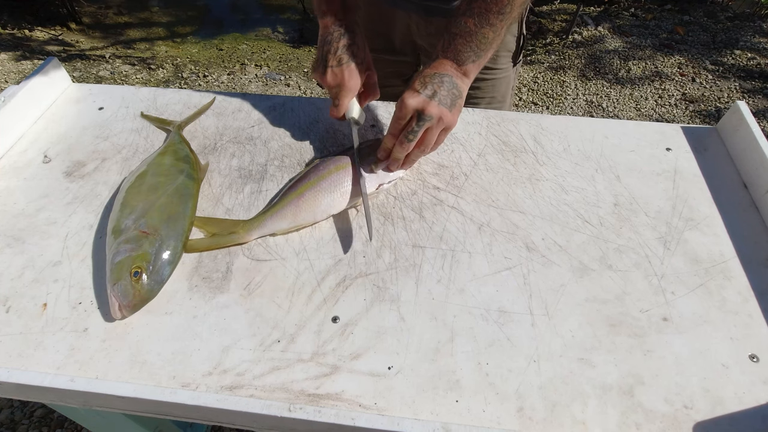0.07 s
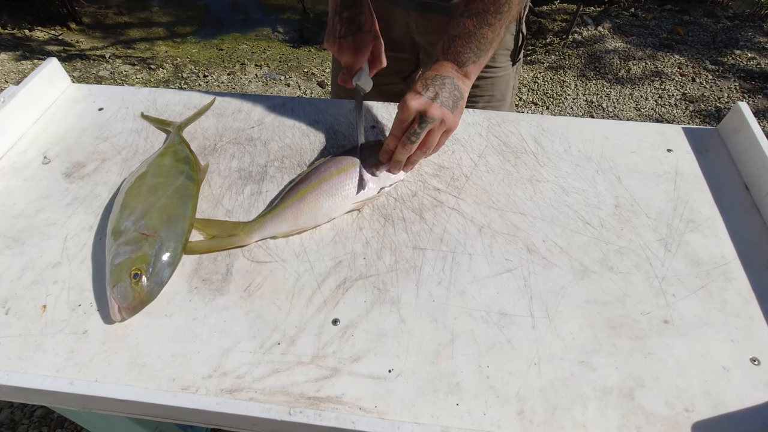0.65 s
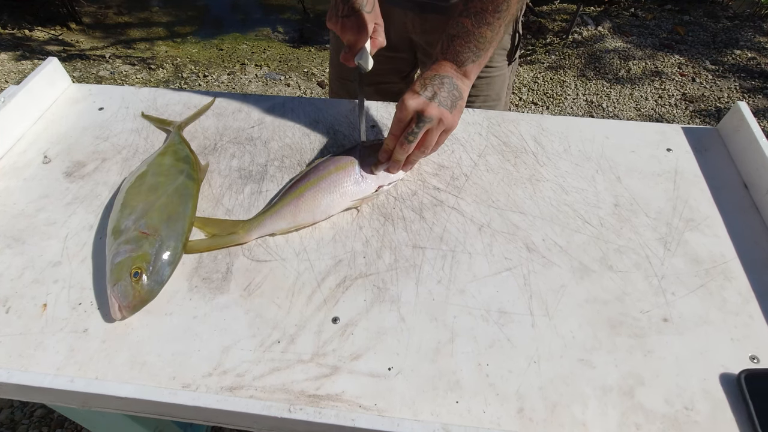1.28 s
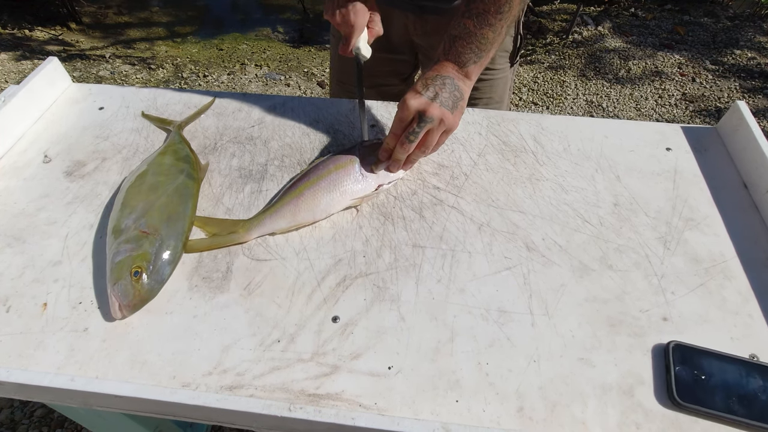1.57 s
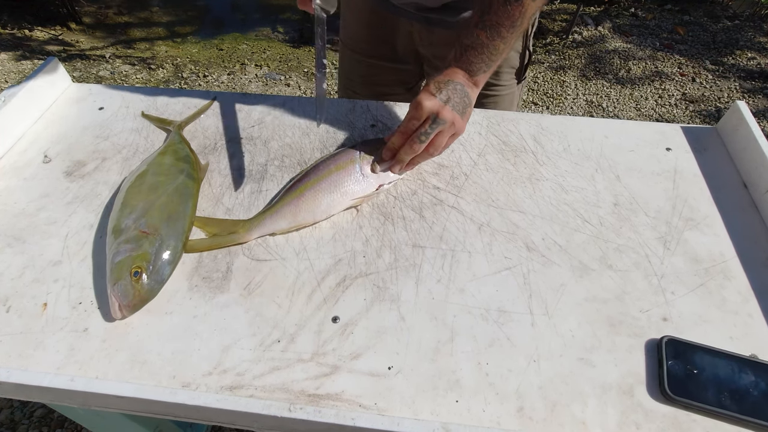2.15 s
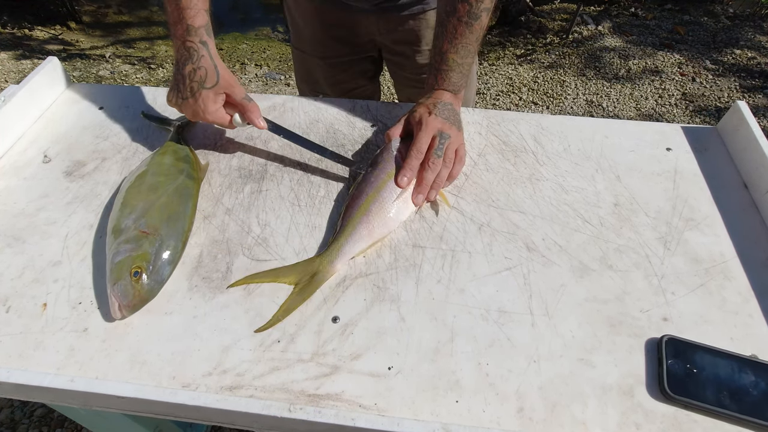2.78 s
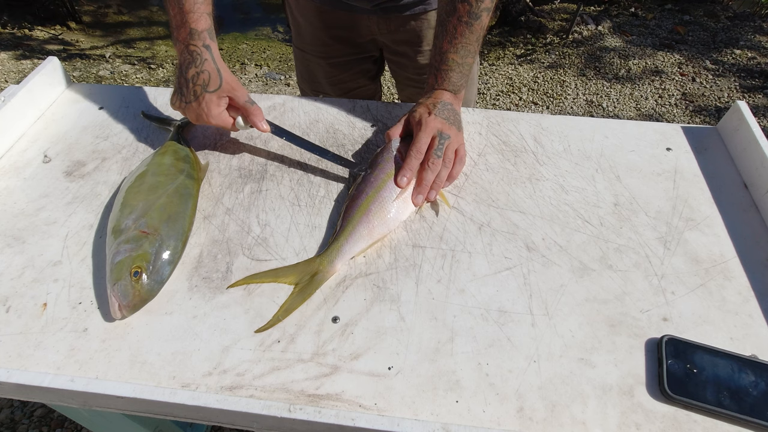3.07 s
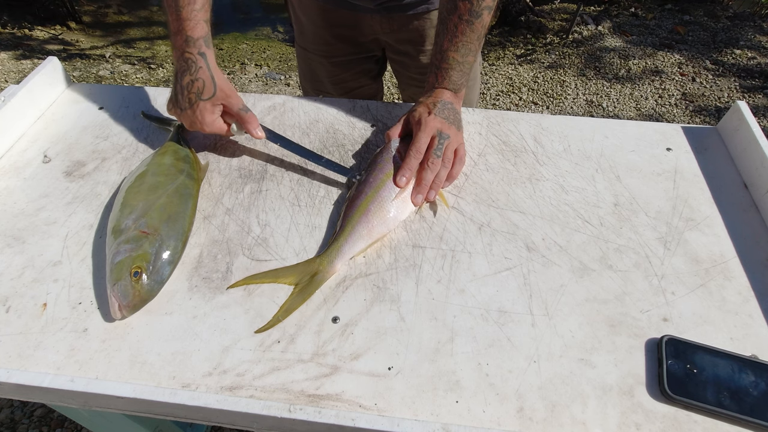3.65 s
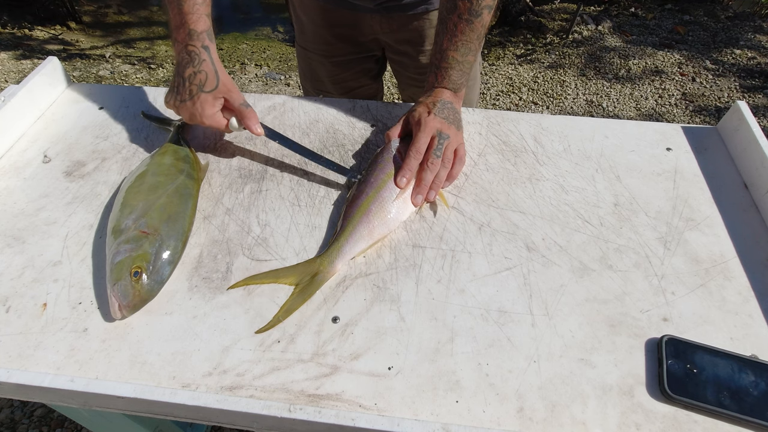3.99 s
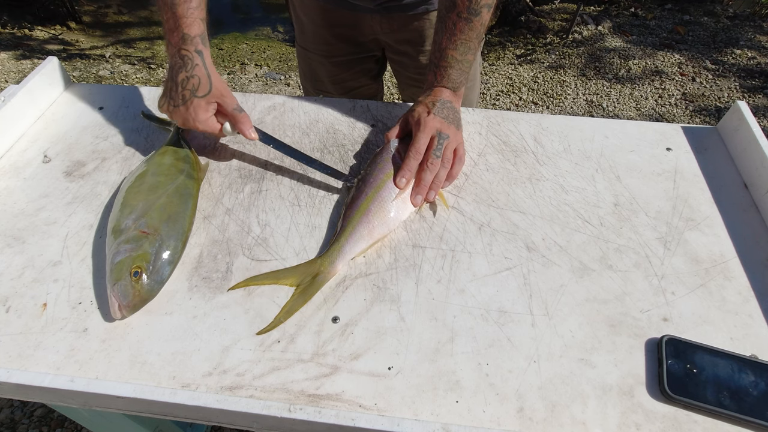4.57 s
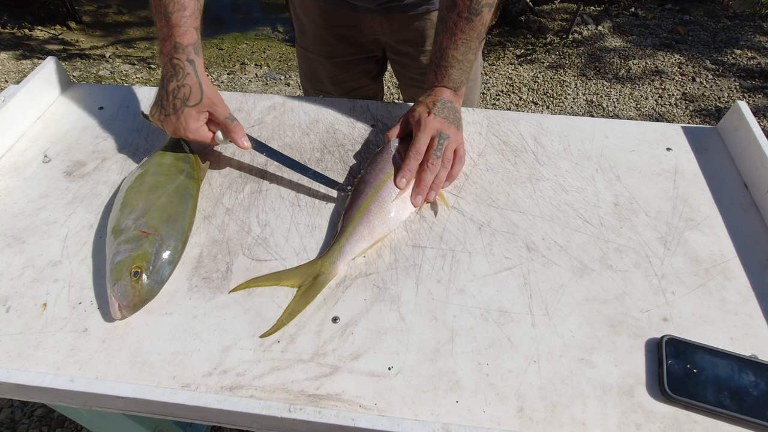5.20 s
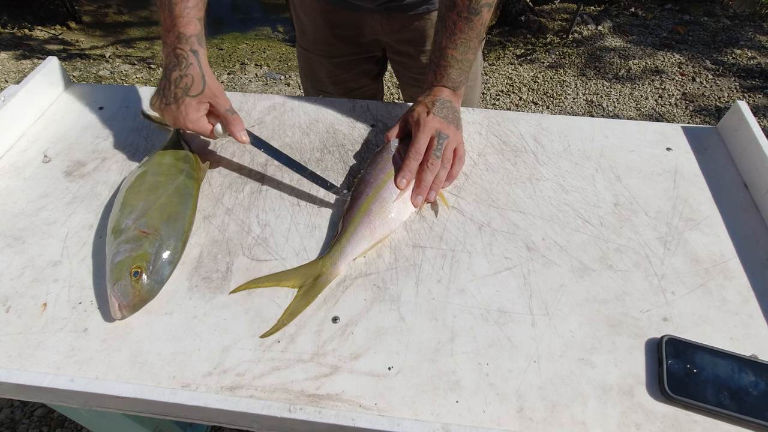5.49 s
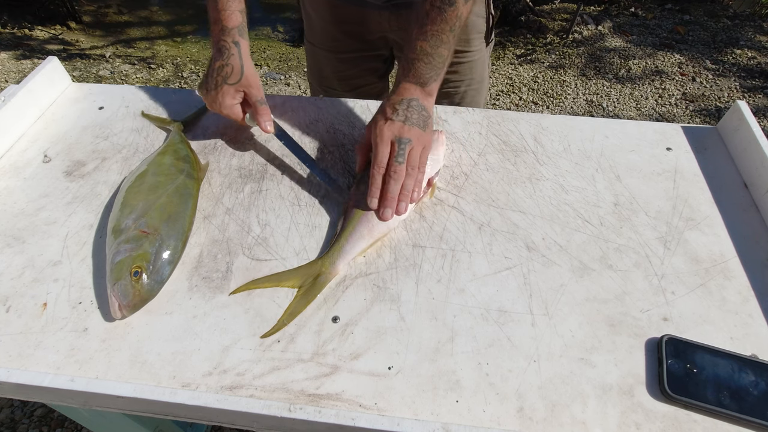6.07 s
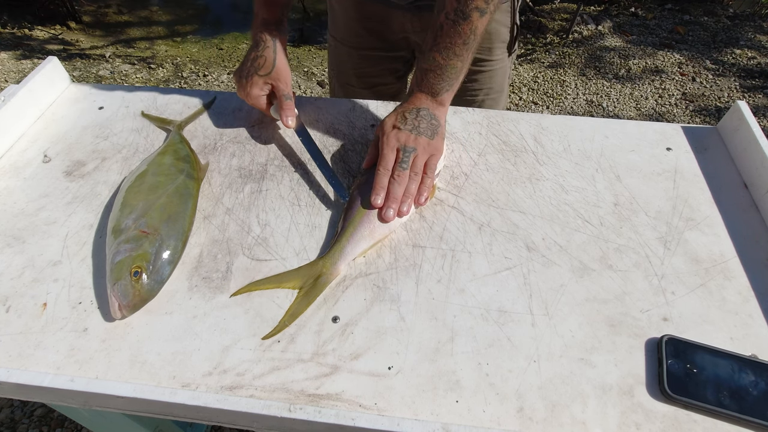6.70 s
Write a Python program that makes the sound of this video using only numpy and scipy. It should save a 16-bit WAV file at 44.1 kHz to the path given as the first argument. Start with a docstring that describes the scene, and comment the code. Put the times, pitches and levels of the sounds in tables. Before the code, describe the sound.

A knife rasps through a fish's scales on a plastic table outdoors, with sharp little snaps and dull bumps. A phone is set down and rocks to rest in a few hollow knocks. The blade gives a light ring, then works on more quietly with wet slides, tiny crackles and a cluster of gritty cuts. A faint rumble and light puffs of wind on the microphone lie underneath.

```python
"""A knife rasps through a fish on a plastic cleaning table outdoors, snapping small bones, bumping the board.
Tiny tears ring blade and fish; wet flesh hisses along the steel and murmurs in the board.
A phone is laid on the table and rocks to rest with a few hollow, rebounding knocks.
Behind it: a thin whine, a faint rumble, light puffs of wind on the microphone and a far motor's hum."""
import sys
import numpy as np
from scipy import signal
from scipy.fft import rfft, irfft, next_fast_len
from scipy.io import wavfile
from scipy.ndimage import map_coordinates

SR = 44100
rng = np.random.default_rng(int(sys.argv[2]) if len(sys.argv) > 2 else 0)


def persist_wave(psi):
    """Save psi, clipped to +-1, as 16-bit WAV."""
    counts = np.round(np.clip(psi, -1, 1) * 32767).astype(np.int16)
    wavfile.write(sys.argv[1], SR, np.atleast_2d(counts).T)


N = 306054
T = np.arange(SR // 2) / SR  # time within one blow, s
SECOND_PART_S = 2.4  # the second part begins: a slit along the back replaces the rasp

# Firm cuts through skin and scales. Each row: start, attack, hold in s, rasp in dB, board drag in dB.
CUT_STROKES = [(0.026, 0.032, .07, -50.5, -48), (0.197, 0.042, .095, -43.5, -45),
               (0.568, 0.04, 0.0079, -51.5, -42.5), (2.836, 0.019, 0.02, -67.5, -70),
               (3.285, 0.032, 0.012, -74.5, -80), (4.459, .02, 0.0052, -61.5, -72),
               (4.514, 0.03, 0.0027, -58, -53), (4.836, 0.027, 0.026, -56.5, -58),
               (4.947, 0.018, 0.015, -58, -48.5), (5.543, 0.009, 0.013, -53.5, -55.5),
               (5.617, 0.011, .003, -64, -57), (5.726, 0.055, 0.0085, -66, -61.5)]
# Flat of the blade in wet flesh. Each row: start, attack, hold in s, hiss in dB, board drag in dB.
GLIDE_STROKES = [(0.36, 0.036, 0.074, -66.5, -56.5), (0.52, 0.028, 0.061, -59, -50.5),
                 (0.652, .04, 0.044, -71, -54.5), (0.822, 0.028, 0.049, -62.5, -50),
                 (0.93, 0.08, 0.05, -76.5, -54), (1.108, 0.097, 0.043, -69, -55),
                 (1.21, 0.046, 0.031, -71, -67), (1.959, 0.13, .04, -76, -75),
                 (2.827, 0.025, 0.021, -69, -78.5), (2.925, 0.022, 0.054, -77.5, -70),
                 (3.288, 0.054, 0.032, -73.5, -65), (3.402, 0.036, 0.042, -78.5, -78),
                 (4.39, .05, .06, -76, -72), (5.543, 0.0074, 0.01, -57, -75),
                 (6.396, 0.16, 0.048, -73, -74), (6.648, .01, 0.044, -74.5, -64)]
# Steel on wet flesh. Each row: frequency in Hz, level in dB.
WET_SPECTRUM = [(500, -24.5), (1500, -3.5), (2200, -7), (3200, 3.5), (5000, 1), (6600, 0.5), (8200, -7.5),
                (10000, -12.5), (15000, -31)]
# Blade and fish. Each row: centre in Hz, width in Hz.
FISH_RESONANCES = [(1550, 170), (2450, 200), (3000, 240), (4250, 300), (5500, 300), (6600, 450),
                   (7700, 300), (9200, 400), (12200, 600)]
# Ring of the table top. Each row: frequency in Hz, level in dB, t60 in s.
TABLE_MODES = [(148, -13.5, .22), (207, -15.5, 0.06), (248, -23, 0.073), (297.7, 0, .24), (342, -7.5, 0.28),
               (448, -7, 0.12), (502, -8, .12), (637, -15, .1), (726, -10, 0.11)]
# Dull response of the board. Each row: frequency in Hz, level in dB.
THUD_SPECTRUM = [(30, -18), (85, -12.5), (140, 8), (210, -1), (320, -0.5), (550, -2), (900, -21.5),
                 (2500, -30.5), (9000, -65.5)]


def slicing():
    """A dense rasp across the scales, then a grittier slit along the back."""
    # Spectra of the two cuts. Each row: frequency in Hz, level in dB.
    scale_spectrum = [(530, -27), (900, -12), (1060, -14), (1640, -11), (2030, -14.5), (3060, -7.5),
                      (3370, -9), (5370, -4), (9320, -10.5), (12000, -9), (15800, -14)]
    back_spectrum = [(650, -55), (1100, -15), (1550, -2), (1840, -16), (2430, -1.5), (3670, -4), (4190, 4),
                     (4960, -5.5), (6190, -2), (9250, -6.5), (10100, -7), (12500, -3.5), (15800, -18)]
    rasp = tearing(scale_spectrum, per_s=2800, spread_db=5.3, hiss_db=-1.5, chatter_db=3.5, peaks_db=-1.5)
    slit = tearing(back_spectrum, per_s=1000, spread_db=4.2, hiss_db=-1, chatter_db=5.5, peaks_db=2.5)
    force, _ = gestures(CUT_STROKES, release_s=.05)
    return force * np.where(np.arange(N) < SECOND_PART_S * SR, rasp, slit)


def tearing(spectrum, per_s, spread_db, hiss_db, chatter_db, peaks_db):
    """Tiny tears in three sizes, each in its own flurries, ring the blade and the fish."""
    bands = ([(3500, 0), (7000, -18)],  # Hz, dB
             [(2500, -18), (5000, 0), (8000, 0), (14000, -18)],
             [(6000, -18), (11000, 0)])
    rasp = 0
    for band in bands:
        tears = (rng.random(N) < per_s / SR) * rng.choice([-1, 1], N)
        sizes = amp(spread_db * np.minimum(rng.exponential(size=N), 3))
        flurries = amp(chatter_db * wobble(120))
        rasp += flurries * shaped(unit(tears * sizes) + amp(hiss_db) * rng.standard_normal(N), band)
    return unit(resonant(rasp, spectrum, FISH_RESONANCES, peaks_db))


def sliding(glide_db=-1, stick_db=2):
    """Wet friction of blade on flesh and fish on board: a hiss that catches and lets go."""
    # Skin sliding on the board as the second part begins. Each row: time in s, level in dB.
    slide_levels = [(2.52, -59), (2.57, -107), (2.59, -67.5), (2.66, -77), (2.8, -89.5)]
    # Skin on the board. Each row: frequency in Hz, level in dB.
    skin_spectrum = [(300, -12), (800, 4), (1600, 3), (2500, -1), (3500, -10.5), (9000, -28)]
    speed, _ = gestures(GLIDE_STROKES, release_s=.06)
    glide = amp(glide_db) * speed * friction(WET_SPECTRUM, stick_db, catch_hz=250)
    return glide + level(slide_levels) * friction(skin_spectrum, stick_db, catch_hz=250)


def dragging(gain_db=-3):
    """Every cut and glide drags the flesh, which murmurs in the board."""
    _, pull = gestures(CUT_STROKES + GLIDE_STROKES, release_s=.09)
    return amp(gain_db) * pull * friction(THUD_SPECTRUM, stick_db=2.5, catch_hz=60)


def crackle(per_s=22, floor_db=-73, spread_db=4):
    """Fibres part one by one as the tip works along the back."""
    partings = (rng.random(N) < per_s / SR) * (np.arange(N) > SECOND_PART_S * SR)
    sizes = amp(floor_db + spread_db * np.minimum(rng.exponential(size=N), 3))
    tick = crest(resonant(burst(.0077), WET_SPECTRUM, FISH_RESONANCES, peaks_db=9))
    return signal.fftconvolve(partings * sizes, tick)[:N]


def snaps(skirt_db_per_octave=10, crumble_db=-8, peaks_db=8):
    """Millisecond cracks with a short crumbling tail, most from scales and small bones giving way."""
    # Each row: start in s, peak in dB, pitch in Hz, top-octave gain in dB.
    cracks = [(0.0154, -41.5, 4040, -8), (0.0255, -47, 6060, -15), (0.0312, -20.5, 6700, -13.5),
              (0.0702, -33.5, 11500, 0), (0.0772, -30.5, 4550, -22), (0.114, -37.5, 5740, -24),
              (0.2042, -23, 7200, -12.5), (0.263, -28.5, 2860, -3.5), (0.2812, -20, 6710, -5),
              (0.5721, -31, 2880, -15), (0.9717, -50, 6090, -16), (2.5128, -49.5, 3500, 0),
              (2.8466, -50, 4400, -23), (2.9407, -51.5, 4100, -3), (3.2904, -49, 4380, -29),
              (4.1058, -51.5, 3460, -10), (4.4567, -42, 4500, -20), (4.518, -34, 6270, -1),
              (4.7249, -50, 4640, -2), (4.8339, -41.5, 3980, -3), (4.9301, -40.5, 7140, -1),
              (4.9447, -38.5, 3040, 13), (4.9821, -45, 3000, 8.5), (5.5418, -39.5, 4180, -10),
              (5.5494, -38, 4160, -9), (5.5614, -53, 4930, -15), (5.5674, -36.5, 2370, -7.5),
              (5.6519, -43, 4230, -16), (5.7324, -46, 6470, -4), (5.8574, -53.5, 5400, -13),
              (5.9267, -50, 3900, -8), (6.361, -53, 6000, -25), (6.416, -47, 6260, -33)]  # the one at 2.513 s is just a sharp click
    out = np.zeros(N)
    for start_s, peak_db, pitch_hz, top_db in cracks:
        crack = burst(.00142) + amp(crumble_db) * burst(.036)
        treble = [(7000, 0), (12000, top_db)]
        skirt_db = lambda hz: skirt_db_per_octave * np.abs(np.log2((hz + 1) / pitch_hz))
        tone_db = lambda hz: along(treble, hz) + peaks_db * humps(FISH_RESONANCES, hz) - skirt_db(hz)
        add(out, start_s, amp(peak_db) * crest(colour(crack, tone_db)))
    return out


def ticks(gain_db=-1, peaks_db=17, width_ratio=.14, tail_db=-16, cushion_s=.0029, ring_db=-10, t60_s=.05):
    """Steel meets bone and board; flesh cushions the contact and the lower resonance rings on."""
    # Each row: start in s, level in dB, lower and upper resonance in Hz, upper offset in dB.
    touches = [(0.358, -56, 3380, 3700, -12), (0.7296, -54, 1132, 2420, -3),
               (1.0021, -54.5, 1150, 2500, -0.5), (1.263, -55.5, 1110, 2360, -21),
               (1.989, -62, 3210, 6500, 5), (2.015, -49.5, 2680, 5000, 0), (2.222, -70.5, 1545, 3000, -2.5),
               (6.547, -62.5, 1660, 4400, -3), (6.637, -65, 1570, 6100, 0), (6.662, -64, 1630, 6040, -9),
               (6.682, -70, 1580, 6200, -5), (6.7, -70, 1610, 6100, -4), (6.767, -69.5, 1630, 3720, -4)]
    spectrum = [(100, -21), (500, 6.5), (3000, -3), (7000, -9), (10000, -16), (15000, -32.5)]  # Hz, dB
    out = np.zeros(N)
    for start_s, db, lower_hz, upper_hz, upper_db in touches:
        tick = (burst(.022) + amp(tail_db) * burst(.16)) * (1 - fade(cushion_s))
        lower = lambda hz: peaks_db * humps([(lower_hz, width_ratio * lower_hz)], hz)
        upper = lambda hz: (peaks_db + upper_db) * humps([(upper_hz, width_ratio * upper_hz)], hz)
        contact = punch(colour(tick, lambda hz: along(spectrum, hz) + np.maximum(lower(hz), upper(hz))))
        ringing = amp(ring_db) * punch(ring([(lower_hz, 0, t60_s)]))
        add(out, start_s, amp(db + gain_db) * (contact + ringing))
    return out


def blade():
    """Lifted out of the flesh, the steel rings briefly."""
    # Each row: start in s, level in dB.
    taps = [(1.991, -64), (2.015, -51)]
    # Each row: frequency in Hz, level in dB, t60 in s.
    steel_modes = [(965, -4, 0.089), (2417, 0.5, .09), (3830, -16, 0.11)]
    out = np.zeros(N)
    for start_s, db in taps:
        add(out, start_s, amp(db) * ring(steel_modes))
    return out


def bumps(gain_db=-8, ring_db=-12):
    """Dull thumps with a little table ring, most from the knife bumping the board through the fish."""
    # Each row: start in s, level in dB.
    thumps = [(0.077, -36), (0.112, -35.5), (0.261, -25.5), (0.278, -30), (0.36, -41.5), (0.574, -28),
              (2.015, -45), (2.5122, -49), (4.515, -51.5), (4.951, -48), (4.982, -42.5)]  # the one at 2.512 s is just a dull thump under the sharp click
    out = np.zeros(N)
    for start_s, db in thumps:
        thump = punch(shaped(burst(.0019) + amp(-1) * burst(.0323), THUD_SPECTRUM))
        ringing = amp(ring_db) * punch(ring(TABLE_MODES)) * (1 - fade(.019))
        add(out, start_s, amp(db + gain_db) * (thump + ringing))
    return out


def phone():
    """A phone rocks on the hollow table: each contact gives a clack, a click and a boom."""
    # Higher table resonances. Each row: centre in Hz, width in Hz.
    panel = [(877, 50), (974, 30), (1170, 60), (1462, 50), (1622, 45), (1800, 70), (2084, 45), (2300, 100),
             (3010, 170), (3490, 130), (4470, 300), (6290, 180), (7100, 130), (8400, 300)]
    hits = rebounds()
    hardest_db = max(hit[-1] for hit in hits)
    out = np.zeros(N)
    for start_s, clack_db, boom_db, click_db in hits:
        hardness_db = click_db - hardest_db
        add(out, start_s, amp(clack_db - 1) * clack(panel, hardness_db))
        add(out, start_s, amp(click_db - 2) * click(panel, hardness_db))
        add(out, start_s, amp(boom_db - 1) * boom())
    return out


def rebounds(count=3, flight_ratio=.97, clack_loss_db=10, click_loss_db=15):
    """Each knock bounces in ever shorter flights, losing clack and click."""
    # Each row: start in s, clack, boom, click in dB, first flight in s, boom loss per rebound in dB.
    knocks = [(1.173, -48, -45, -79, 0.026, -2), (1.2404, -43, -33, -76.5, 0.0058, 8),
              (1.3095, -26.5, -29, -41.5, 0.027, 2), (1.382, -25.5, -25.5, -38, .035, 17),
              (1.469, -37.5, -51, -55, 0.027, 2), (1.4991, -24.5, -25.5, -31.5, .0385, 9)]
    hits = []
    for start_s, clack_db, boom_db, click_db, flight_s, boom_loss_db in knocks:
        for k in range(count):
            time_s = start_s + flight_s * sum(flight_ratio ** j for j in range(k))
            hits.append((time_s, clack_db - k * clack_loss_db,
                         boom_db - k * boom_loss_db, click_db - k * click_loss_db))
    return hits


def clack(panel, hardness_db, dulling=.5, rattle_db=-7, delay_s=.0012, delay_at_hz=877):
    """Low bending waves travel slower: a falling chirp. Gentle contacts sound duller."""
    # Each row: frequency in Hz, level in dB.
    spectrum = [(200, -11.5), (450, -5), (850, 4), (1150, 1.5), (1700, -9), (2400, -11), (3500, -21.5),
                (4600, -21.5), (7000, -34), (15000, -52)]
    treble = [(1000, 0), (4000, dulling * hardness_db)]
    bending = np.exp(-4j * np.pi * delay_s * np.sqrt(delay_at_hz * np.fft.rfftfreq(len(T), 1 / SR)))
    blow = burst(.024) + amp(rattle_db) * burst(.13) + amp(-23) * burst(.56)
    tone_db = lambda hz: along(spectrum, hz) + along(treble, hz) + 6 * humps(panel, hz)
    return punch(colour(irfft(rfft(blow) * bending), tone_db))


def click(panel, hardness_db, muffling=.73, scatter_db=-19):
    """The contact's sharp edge and its scatter off the ground; only hard hits reach the top octave."""
    # Each row: frequency in Hz, level in dB.
    spectrum = [(600, -25.5), (2000, 9), (3400, 2.5), (4600, -6.5), (6300, -6), (9000, -14.5),
                (15000, -19.5)]
    treble = [(5000, 0), (12000, muffling * hardness_db)]
    tone_db = lambda hz: along(spectrum, hz) + along(treble, hz)
    edge = punch(colour(burst(.015), lambda hz: tone_db(hz) + 6 * humps(panel, hz)))
    return edge + amp(scatter_db) * punch(colour(burst(.42), tone_db))


def boom(travel_s=.013, thud_db=-2):
    """Slow bending waves swell the table's low modes after the clack."""
    thud = punch(shaped(burst(.12), THUD_SPECTRUM))  # close modes between the strong ones
    swell = (1 - np.exp(-(T / travel_s) ** 2)) * (fade(.09) + amp(-21))
    return punch((punch(ring(TABLE_MODES)) + amp(thud_db) * thud) * swell)


def whine(tones_hz=(3650, 8600), width_hz=90, gain_db=-3, flicker_db=3):
    """Two faint, fuzzy high tones come and go, flickering."""
    # Each row: start, attack, hold in s, lower tone in dB, upper tone in dB.
    swells = [(.528, 0.023, 0.015, -72, -51), (0.555, .02, 0.028, -53.5, -60),
              (0.63, .04, 0.09, -69, -72.5), (0.77, 0.082, 0.25, -75, -92),
              (2.486, .012, 0.021, -64.5, -79), (6.662, .04, 0.04, -71, -95)]
    out = 0
    for centre_hz, envelope in zip(tones_hz, gestures(swells, release_s=.021)):
        band_db = lambda hz: 20 * np.log10(humps([(centre_hz, width_hz)], hz))
        tone = unit(colour(rng.standard_normal(N), band_db))
        out += tone * amp(flicker_db * wobble(29.2)) * envelope
    return amp(gain_db) * out


def outdoors(gain_db=-1, drift_db=.4):
    """A far rumble, and breeze that buffets the microphone now and then."""
    # Each row: time in s, level in dB.
    rumble_levels = [(0, -60), (1.6, -58), (1.9, -68), (2.5, -68), (2.52, -64), (4, -62), (5.5, -62),
                     (6.94, -60.5)]
    # Each row: start, attack, hold in s, level in dB.
    puffs = [(1.18, 0.038, 0.11, -49.5), (1.818, 0.19, 0.02, -45), (2.09, 0.28, 0.14, -54),
             (2.3, .02, 0.05, -51.5), (2.498, 0.017, 0.0071, -37), (4.46, 0.032, 0.032, -45.5),
             (4.52, 0.057, 0.066, -43), (4.62, 0.066, 0.15, -52), (4.952, .03, 0.031, -38.5),
             (5.02, .04, 0.19, -55)]
    # Each row of both: frequency in Hz, level in dB.
    rumble_spectrum = [(12, -33), (20, -11), (42, -4.5), (59, -5), (85, 0), (176, -7.5), (233, -6),
                       (268, -12.5), (397, -14), (570, -15.5), (996, -21), (1390, -25.5), (3310, -34.5),
                       (8790, -38), (15800, -54)]
    wind_spectrum = [(12, -4), (28, 4.5), (55, 0), (100, -13), (200, -34), (600, -54), (3000, -100)]
    drift = amp(drift_db * wobble(5))
    rumble = level(rumble_levels) * drift * unit(shaped(rng.standard_normal(N), rumble_spectrum))
    breeze, = gestures(puffs, release_s=.02)
    wind = breeze * unit(shaped(rng.standard_normal(N), wind_spectrum))
    return amp(gain_db) * (rumble + wind)


def hum(waver_db=.5, wander_rad=.35):
    """A far motor hums faintly during the second cut."""
    # Each row: frequency in Hz, rms level in dB.
    partials = [(118.4, -73), (236.9, -79)]
    t = np.arange(N) / SR
    out = 0
    for hz, db in partials:
        peak = np.sqrt(2) * amp(db + waver_db * wobble(12))
        out += peak * np.sin(2 * np.pi * hz * t + wander_rad * wobble(6.3))
    return (t > SECOND_PART_S) * out


def amp(db):
    """Decibels to gain."""
    return 10 ** (np.asarray(db) / 20)


def unit(x):
    """Scale to rms 1."""
    return x / np.sqrt(np.mean(x ** 2) + 1e-20)


def crest(x):
    """Scale to peak 1."""
    return x / (np.abs(x).max() + 1e-20)


def punch(x):
    """Scale a blow to rms 1 over its first 20 ms."""
    return x / np.sqrt(np.mean(x[:SR // 50] ** 2) + 1e-20)


def along(points, hz):
    """Interpolate (Hz, dB) points on a log frequency axis."""
    knots_hz, db = np.transpose(points)
    return np.interp(np.log(hz + 1), np.log(knots_hz + 1), db)


def humps(resonances, hz):
    """1 on each (Hz, width Hz) resonance, falling towards 0 between them."""
    return np.max([1 / (1 + ((hz - centre) / width) ** 2) for centre, width in resonances], axis=0)


def level(points):
    """Gain per sample from (s, dB) points, silent outside them."""
    t = np.arange(N) / SR
    times_s, db = np.transpose(points)
    return amp(np.interp(t, times_s, db)) * (t >= times_s[0]) * (t <= times_s[-1])


def gestures(rows, release_s):
    """Gain per sample for each dB column; the attack leads up to start. Attack and release span 20 dB."""
    t = np.arange(N) / SR
    gain = 0
    for start_s, attack_s, hold_s, *dbs in rows:
        away = np.maximum(start_s - t, 0) / attack_s + np.maximum(t - start_s - hold_s, 0) / release_s
        gain = np.maximum(gain, amp(dbs)[:, None] * amp(-20 * np.minimum(away, 10)))
    return gain


def wobble(rate_hz):
    """A smooth random curve, rate_hz knots a second."""
    knots = rng.standard_normal(int(N * rate_hz / SR) + 4)
    return map_coordinates(knots, [np.arange(N) * rate_hz / SR])


def colour(x, gain_db):
    """Minimum-phase filter; gain_db is a function of frequency."""
    size = 2 * next_fast_len(len(x) // 2 + SR // 8)
    cepstrum = irfft(np.log(amp(gain_db(np.fft.rfftfreq(size, 1 / SR))) + 1e-6))
    cepstrum[1:size // 2] *= 2
    cepstrum[size // 2 + 1:] = 0
    return irfft(rfft(x, size) * np.exp(rfft(cepstrum)))[:len(x)]


def shaped(x, spectrum):
    """x through a (Hz, dB) spectrum."""
    return colour(x, lambda hz: along(spectrum, hz))


def resonant(x, spectrum, resonances, peaks_db):
    """x through a spectrum with peaks_db added at each resonance."""
    return colour(x, lambda hz: along(spectrum, hz) + peaks_db * humps(resonances, hz))


def friction(spectrum, stick_db, catch_hz):
    """Stick-slip noise of rms 1."""
    return unit(shaped(rng.standard_normal(N) * amp(stick_db * wobble(catch_hz)), spectrum))


def fade(t60_s):
    """Decay by 60 dB in t60_s."""
    return np.exp(-np.log(1000) * T / t60_s)


def burst(t60_s):
    """Decaying noise of energy 1."""
    x = rng.standard_normal(len(T)) * fade(t60_s)
    return x / np.linalg.norm(x)


def ring(modes):
    """Damped modes, struck at new strengths each time."""
    return sum(amp(db + rng.normal(0, 2.5)) * fade(t60_s) * np.sin(2 * np.pi * (hz * T + rng.random()))
               for hz, db, t60_s in modes)


def add(track, start_s, sound):
    """Mix a sound in at start_s."""
    part = track[max(round(start_s * SR), 0):][:len(sound)]
    part += sound[:len(part)]


def scene():
    """Open air: a dry mono mix."""
    knife = slicing() + sliding() + dragging() + crackle() + snaps() + ticks() + blade() + bumps()
    return (knife + phone() + whine() + outdoors() + hum())[None]


def record(dry):
    """Steep low-pass at the top of the treble."""
    cutoff_hz = 15900
    size = next_fast_len(N + SR // 2)
    lowpass = 1 / np.sqrt(1 + (np.fft.rfftfreq(size, 1 / SR) / cutoff_hz) ** 160)
    return irfft(rfft(dry, size) * lowpass, size)[:, :N]


dry = scene()
out = record(dry)
persist_wave(out)
```